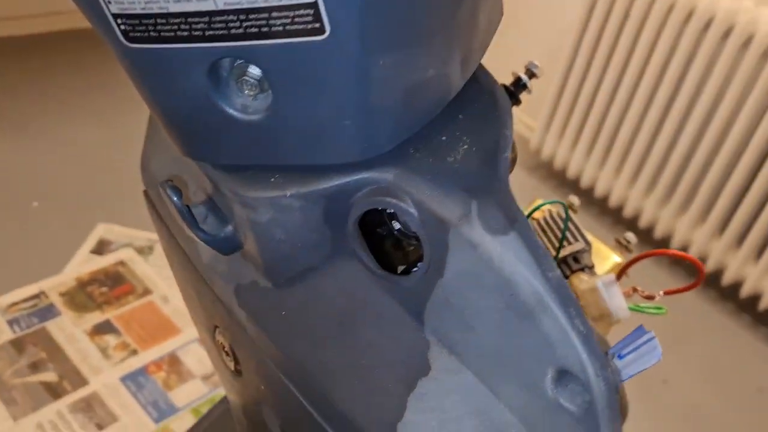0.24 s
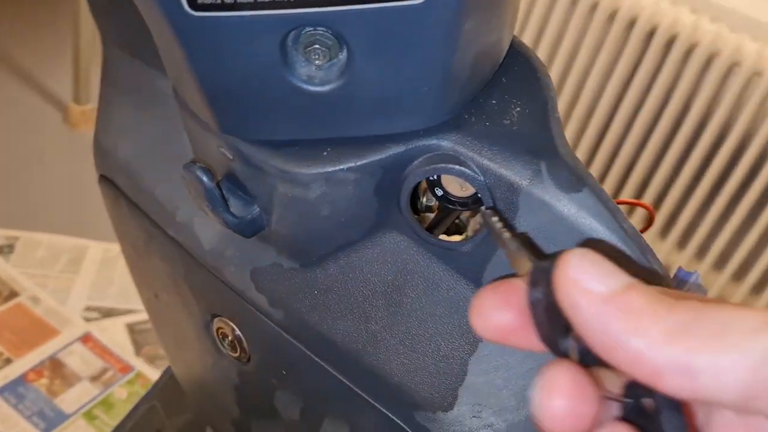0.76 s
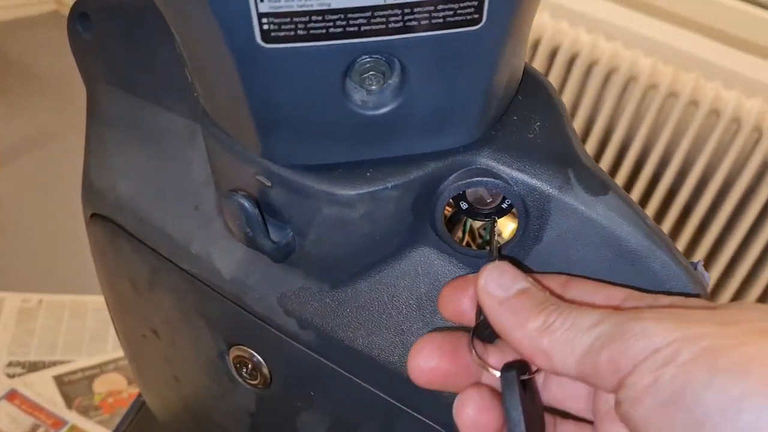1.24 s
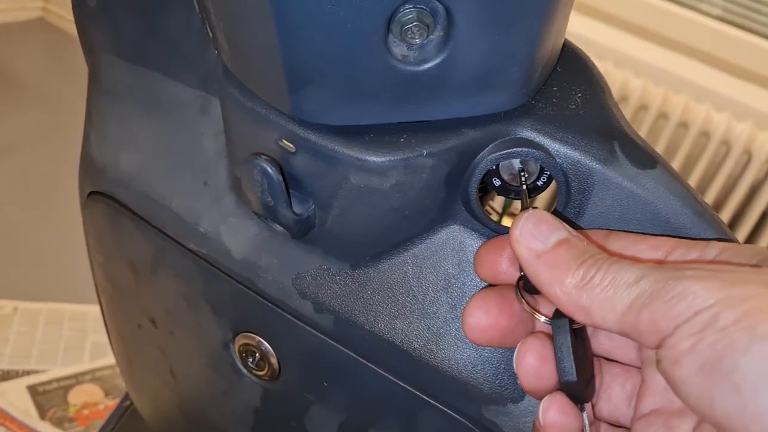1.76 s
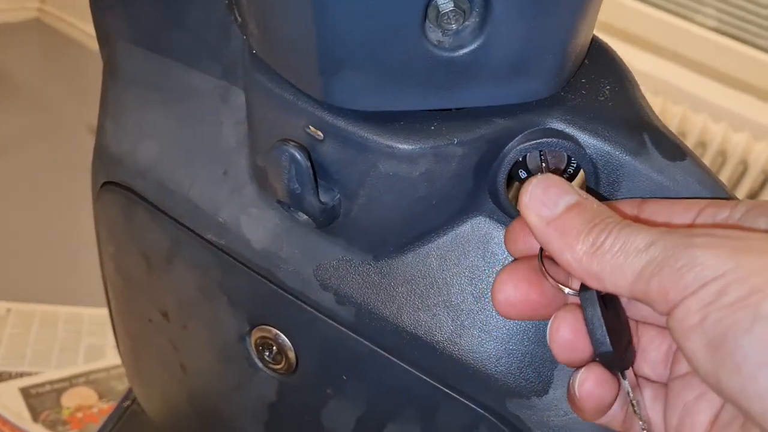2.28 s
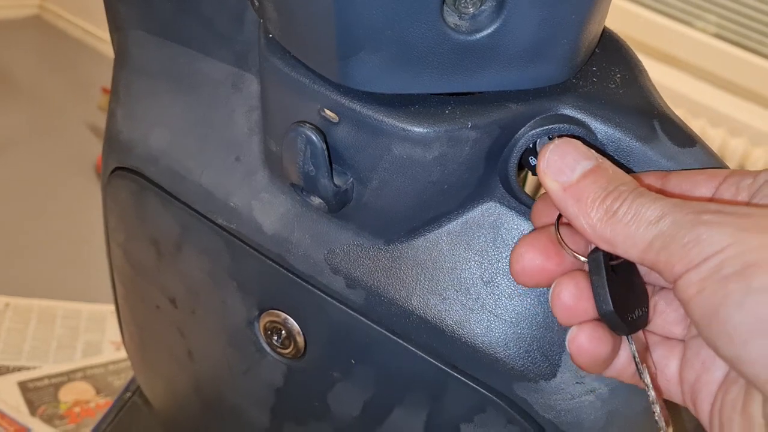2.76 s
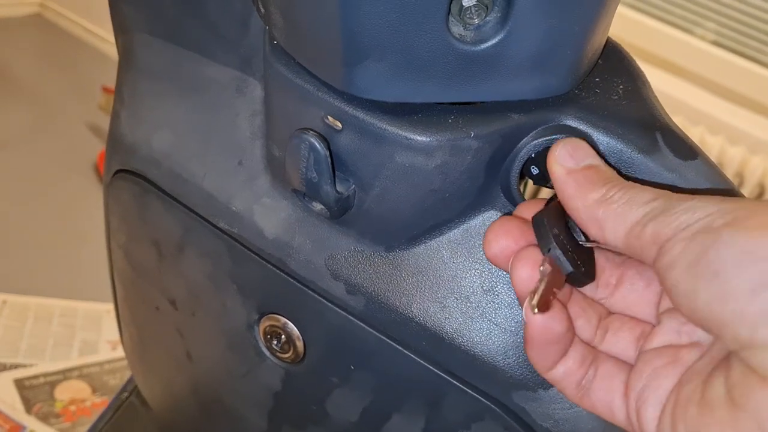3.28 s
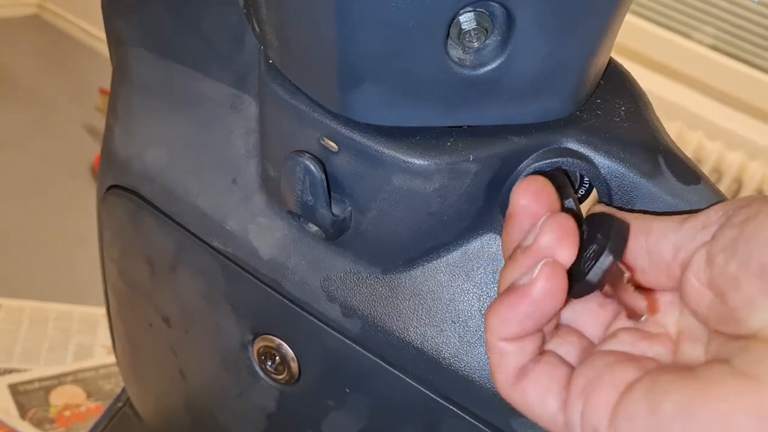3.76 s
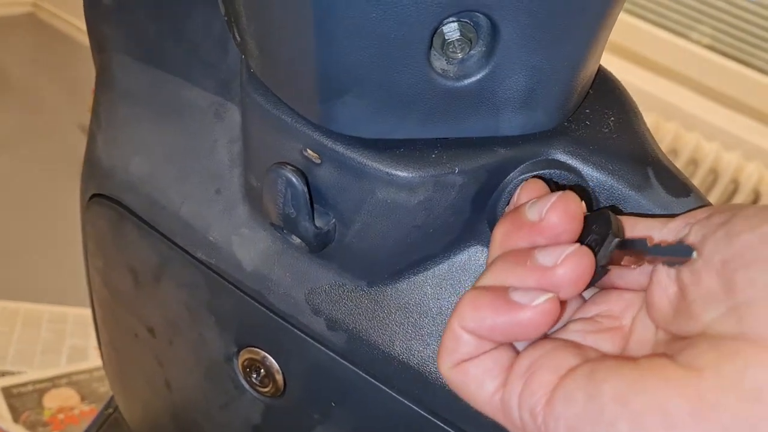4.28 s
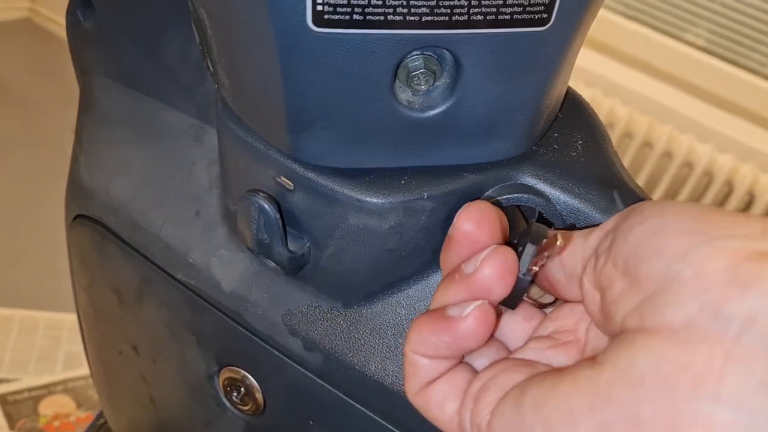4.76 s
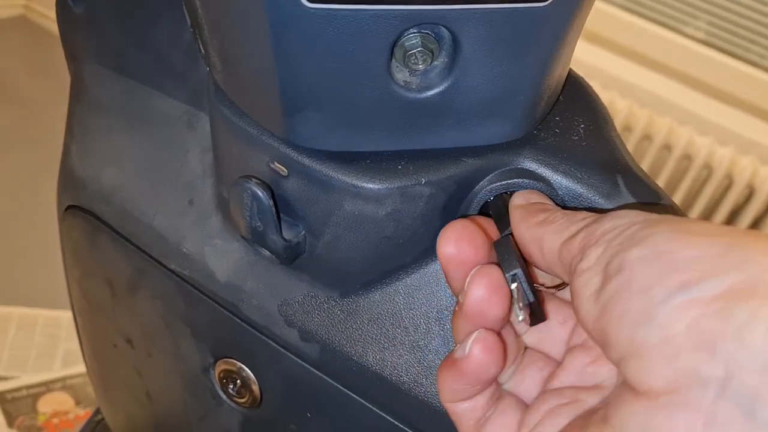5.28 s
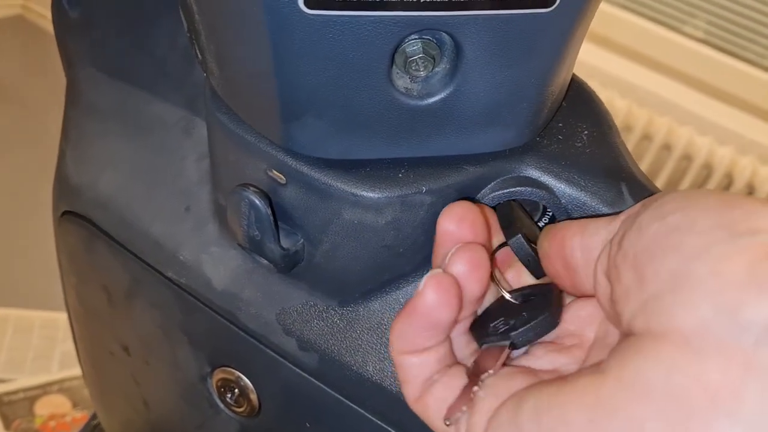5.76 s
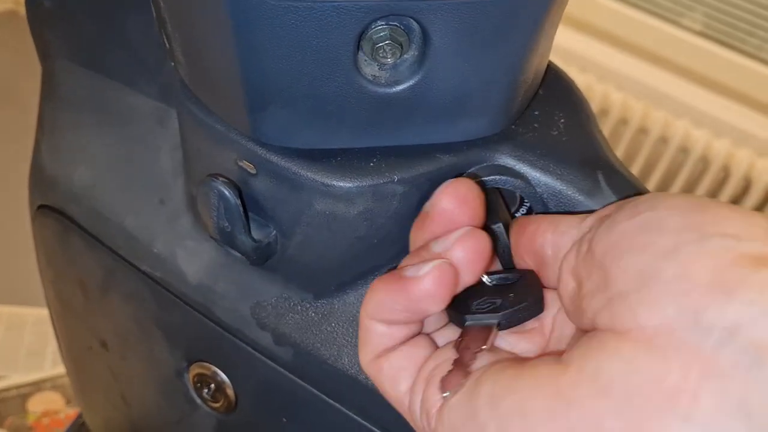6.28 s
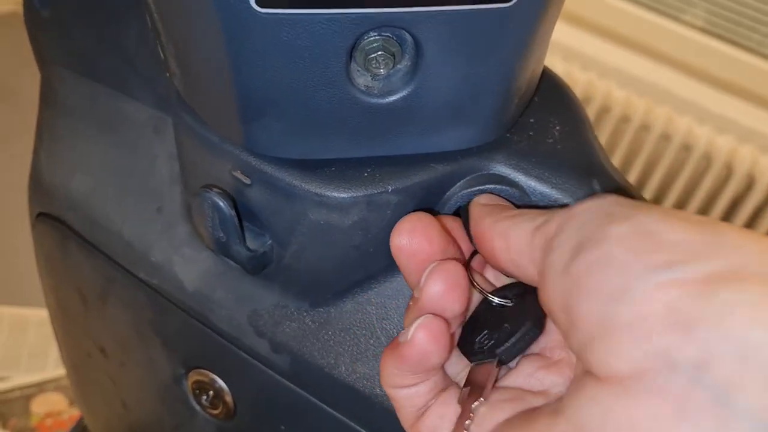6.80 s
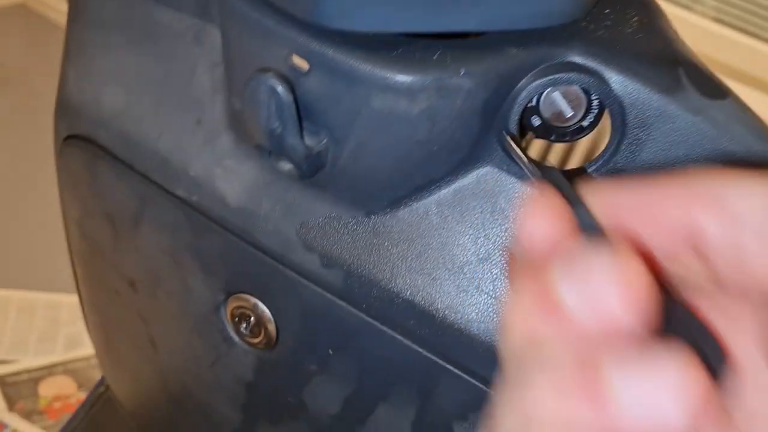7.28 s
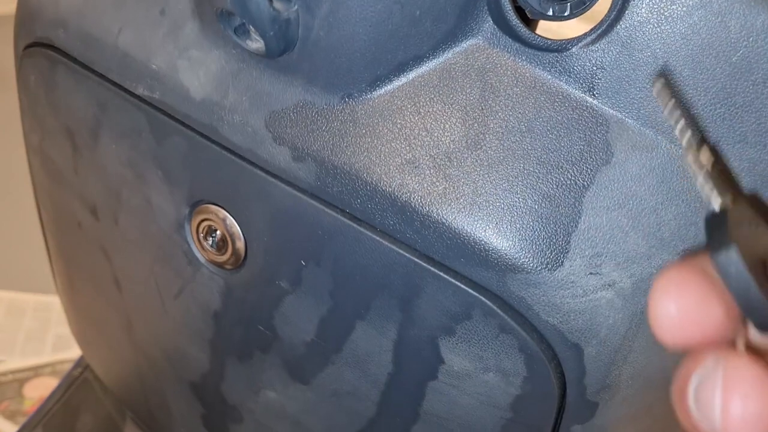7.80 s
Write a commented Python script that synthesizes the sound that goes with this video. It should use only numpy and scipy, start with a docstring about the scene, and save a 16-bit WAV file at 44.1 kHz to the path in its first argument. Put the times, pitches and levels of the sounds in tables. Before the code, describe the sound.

The sound is close, in a small hard-walled room with faint steady air. A sleeve rustles through the first second and a half, with one soft, dull knock at the start. Around 1.3 seconds a metal key scrapes lightly into a scooter's ignition lock, ending in a tick and a thin ping. Another tick comes at 2.2. From 2.8 to 3.5 seconds the key is worked in the lock: a cluster of sharp ticks, short rasps and clacks, with a low rub of the hand on the plastic panel. Soft, dull thuds and faint scrapes follow, with clearer clacks at about 5.4 and 6.1 and lighter ones between and after. At 7.2 seconds the key is pulled out with a bright scrape, a very high short squeak, rapid ticks and a ping, ending in the loudest clack and a slight rumble. A soft sleeve swish fades by 8 seconds.

```python
"""In a small hard room, close by, a key is pushed into a scooter's ignition lock, turned to and fro and pulled
out. Each contact rings the wafers, the lock barrel, its housing and the plastic leg shield. The blade scrapes
in the keyway and squeaks as it leaves, and the keys ping. A sleeve rustles as the hand comes and goes, and
short low rumbles sound now and then over quiet air."""
import sys
import numpy as np
from scipy import signal
from scipy.fft import rfft, irfft
from scipy.io import wavfile

SR = 44100
rng = np.random.default_rng(int(sys.argv[2]) if len(sys.argv) > 2 else 0)


def master_out(mix):
    """Clip the mix to full scale and print it as 16-bit PCM to the path in sys.argv[1]."""
    frames = np.transpose(np.atleast_2d(mix))
    ceiling = np.clip(frames, -1, 1)
    pcm = np.round(ceiling * 32767).astype(np.int16)
    wavfile.write(sys.argv[1], SR, pcm)


N = 354608
TIME = np.arange(N) / SR
RING_SIZE = 12288   # samples of working space for one ring

# Resonances of the lock's three metal parts. Each row: frequency in Hz, width in Hz, level in dB.
HOUSING_MODES = [(548, 110, -4), (730, 60, 6.5), (805, 155, 4.5), (1047, 284, 2), (1267, 232, 3.5),
                 (1780, 670, -2.5), (2060, 197, 0.5), (2126, 506, 1.5), (3110, 1960, -5)]
BARREL_MODES = [(3190, 5400, -6), (4210, 2700, -2.5), (4350, 2770, 3), (6600, 890, -10), (7380, 2900, 5),
                (7690, 570, -3.5)]
WAFER_MODES = [(10000, 660, -4.5), (11400, 690, -4.5), (12950, 3900, -6.5), (13530, 2000, -3),
               (15100, 700, -14)]


def clacks(wafer_db=-10.5):
    """The lock hits a stop: the housing jolts and pushes the shield; hard hits ring barrel and wafers."""
    # Each row: start in seconds, housing level in dB, shield and barrel against the housing in dB,
    # chatter in ms, favoured Hz of the lock and of the shield, left over right in dB.
    stops = [(2.7924, -40.5, -3.5, -17, 9.1, 1230, 340, -1.5),
             (3.047, -35.5, -2.5, -5.5, 3.7, 1620, 334, -1.5), (3.1778, -44.5, 6, -6, 2.1, 770, 305, 1),
             (3.3472, -35, -9.5, -4, 4, 4530, 290, 3), (3.4773, -36, -3.5, -0.5, 3.65, 1400, 310, 1),
             (3.786, -48.5, 5, -28, 4.6, 1170, 315, -1.5), (5.423, -36.5, 3.5, -1.5, 2, 580, 410, 4),
             (5.688, -50, 6.5, -23, 15, 740, 290, -1), (5.717, -44.5, -2, -17, 4.2, 1400, 300, -7),
             (6.105, -38.5, 3.5, -13.5, 1.55, 877, 295, 1.5), (6.5795, -47.5, 6, -5, 4.5, 1290, 278, 1),
             (7.2543, -29, -6.5, -26.5, 2.5, 1310, 170, 2), (7.26, -24.5, -4.5, -26, 1.2, 1124, 180, 0.5),
             (7.271, -34, -1, -14.5, 5.1, 2770, 155, 1.5)]
    out = np.zeros((2, N))
    for s, db, push_db, hardness_db, ms, lock_hz, shield_hz, pan_db in stops:
        barrel_db = db + hardness_db
        clack = contact(db + push_db, db, barrel_db, barrel_db + wafer_db, ms, lock_hz, shield_hz, pan_db)
        add(out, s, clack)
    return out


def ticks(run_start_s=7.1801, run_gap_s=.011, housing_loss=1.59):
    """The blade ticks on the wafers; the sharper a tick, the less it moves the big parts."""
    # Each row: start in seconds, wafer level in dB, sharpness (wafers over barrel) in dB,
    # chatter in ms, left over right in dB.
    single_ticks = [(1.4062, -47, 0, 3.3, 2.5), (2.2494, -46.5, 5, 1.95, 6.5), (2.787, -42.5, 6, 4, 7.5),
                    (2.881, -38.5, 6, 1.55, 5.5), (3.0419, -43, 5, 5.6, -6), (3.0714, -46, 2.5, 2, -5),
                    (3.1467, -44, 8, 2, 1), (3.162, -40.5, 7.5, 3.7, -1.5), (3.3037, -54, -3.5, 3.5, 2),
                    (5.2221, -54, 3, 1, 16), (5.7097, -50.5, 13, 1.5, 11.5), (6.949, -68, 5.5, 2, -1),
                    (7.2257, -29, 9.5, 3.6, 7), (7.235, -42, 9, 2.6, 9)]
    # on the way out the blade drops over four wafers, ever more lightly
    run = [(run_start_s + k * run_gap_s, -34.5 - 3.5 * k, 11.5, 2, 2.5) for k in range(4)]
    out = np.zeros((2, N))
    for s, db, sharpness_db, ms, pan_db in single_ticks + run:
        housing_db = db - housing_loss * sharpness_db
        tick = contact(shield_db=housing_db - 5, housing_db=housing_db, barrel_db=db - sharpness_db,
                       wafer_db=db, chatter_ms=ms, lock_hz=12100, shield_hz=323, pan_db=pan_db)
        add(out, s, tick)
    return out


def nudges():
    """The key leans on the lock: the shield gives with a dull thud and the metal hardly sounds."""
    # Each row: start in seconds, shield level in dB, favoured frequency of the shield in Hz.
    thuds = [(0.28, -50, 316), (3.202, -41, 320), (3.741, -47, 295), (3.795, -46, 310), (3.838, -54, 316),
             (4.482, -46.5, 246), (4.504, -47.5, 244), (4.801, -60.5, 250), (4.86, -56, 252),
             (5.161, -50, 277), (5.181, -42.5, 280), (5.333, -53, 262), (6.342, -46.5, 275),
             (6.376, -45, 277), (7.154, -44, 237), (7.2, -44.5, 317)]
    out = np.zeros((2, N))
    for s, db, shield_hz in thuds:
        thud = contact(shield_db=db, housing_db=db - 28.5, barrel_db=db - 27.5, wafer_db=db - 41,
                       chatter_ms=9, lock_hz=1160, shield_hz=shield_hz, pan_db=-7.5)
        add(out, s, thud)
    return out


def contact(shield_db, housing_db, barrel_db, wafer_db, chatter_ms, lock_hz, shield_hz, pan_db):
    """One force rings four parts; the hand shades the lock to one side, the shield sounds all round."""
    # Resonances of the plastic leg shield. Each row: frequency in Hz, width in Hz, level in dB.
    shield_modes = [(59.1, 18, -17.5), (154, 6.6, -7.5), (230.7, 10.7, 3.5), (263.8, 37, -4.5),
                    (339.3, 21.3, -2), (392, 47, -9.5), (510.5, 128, -10.5)]
    force = chatter(chatter_ms)
    parts = [(HOUSING_MODES, housing_db), (BARREL_MODES, barrel_db), (WAFER_MODES, wafer_db)]
    lock = sum(ring(force, favour(modes, lock_hz), db) for modes, db in parts)
    shield = ring(force, favour(shield_modes, shield_hz), shield_db)
    return lock * pan(pan_db) + shield


def chatter(ms, snap=1.19, snap_at_ms=.5):
    """A clean contact is one snap; a loose one grinds in and bounces to rest."""
    age = np.arange(RING_SIZE // 6) * 1000 / SR / ms   # in decay times
    force = grains(len(age), per_s=7000, spread_db=17.5) * np.exp(-age) * (1 - np.exp(-4 * age))
    force[round(snap_at_ms * SR / 1000)] += snap * np.exp(-ms / 3)
    # hard metal pushes all frequencies alike, so the colour comes from the parts alone
    spectrum = rfft(force)
    return irfft(spectrum / (np.abs(spectrum) + 1e-9))[:len(age) // 2]


def grains(size, per_s, spread_db):
    """Tiny impacts at random moments, of very uneven strength."""
    chance, depth, sign = rng.random((3, RING_SIZE))[:, :size]
    return (chance < per_s / SR) * from_db(-spread_db * depth) * np.sign(sign - .5)


def favour(modes, struck_hz, boost_db=8, octaves=.3):
    """The point of contact favours the resonances near one frequency."""
    return [(hz, width, db + boost_db * np.exp(-(np.log2(hz / struck_hz) / octaves) ** 2))
            for hz, width, db in modes]


def ring(force, modes, db, vary_db=1.84, lag_s=.00006):
    """A force rings a part's modes, with as much energy as 10 ms of steady sound at the given level."""
    hz = np.arange(1, RING_SIZE // 2 + 2) * SR / RING_SIZE
    centre, width, mode_db = np.transpose(modes)
    # each mode has its own strength and its own path to each side; high modes differ most
    strength, left, right, lag = rng.standard_normal((len(centre), 4)).T
    sides = np.array([left, right]) * np.minimum(centre / 3000, 1)
    gain = from_db(mode_db + vary_db * (strength + sides))
    polarity = (-1) ** np.arange(len(centre))
    path = polarity * np.exp(2j * np.pi * centre * lag_s * np.array([lag, -lag]))
    resonances = 1 / (1 + 1j * (hz - centre[:, None] ** 2 / hz) / width[:, None])
    response = (gain * path) @ resonances
    sound = irfft(rfft(force, RING_SIZE) * response)[:, :RING_SIZE * 3 // 4]
    energy = np.mean(np.sum(sound ** 2, axis=1))
    return from_db(db) * sound * np.sqrt(SR / 100 / energy)


def scrapes():
    """The cut edge of the blade rasps over the lock and the wafers."""
    # Each row: start and end in seconds, level in dB, brightness (barrel over housing) in dB.
    strokes = [(1.257, 1.387, -57, -2), (2.673, 2.706, -59, -6), (3.048, 3.102, -45, -11),
               (3.112, 3.18, -51.5, -6), (3.765, 3.866, -64, -0.5), (4.475, 4.536, -78.5, 0),
               (4.783, 4.9, -73, 2.5), (5.149, 5.238, -64.5, 0), (5.676, 5.736, -54, -11),
               (6.346, 6.488, -68, -5), (6.912, 6.989, -67.5, -0.5), (7.146, 7.233, -45, 4.5),
               (7.224, 7.252, -39.5, 4.5)]
    out = np.zeros((2, N))
    for start, end, db, bright_db in strokes:
        size = int(np.clip((end - start) * SR, SR / 100, RING_SIZE // 2))
        force = grains(size, per_s=2500, spread_db=33) * signal.windows.tukey(size, .4)
        # in a bright stroke the smallest parts take over
        parts = [(HOUSING_MODES, 0), (BARREL_MODES, bright_db), (WAFER_MODES, 2 * bright_db - 4)]
        rasp = sum(ring(force, modes, part_db) for modes, part_db in parts)
        add(out, start, from_db(db) * rasp / np.std(rasp[:, :size]))
    return out * pan(2)


def key_pings():
    """The thin metal of the keys pings when flicked."""
    # Each row: start in seconds, pitch in Hz, peak level in dB, seconds to fade by 60 dB.
    pings = [(1.405, 8400, -39, 0.04), (1.407, 7750, -42, 0.048), (1.406, 2640, -38, 0.016),
             (1.407, 4840, -52, .03), (2.785, 12950, -42, 0.15), (2.788, 13300, -41, 0.095),
             (2.787, 12300, -45.5, 0.11), (5.423, 4750, -27.5, 0.01), (5.422, 5290, -27, 0.014),
             (7.226, 11530, -32, 0.14), (7.226, 10300, -45, 0.092)]
    out, age = np.zeros((2, N)), TIME[:RING_SIZE]
    for s, hz, db, t60 in pings:
        add(out, s, from_db(db - 60 * age / t60) * key_tone(hz, RING_SIZE))
    return out


def squeak(hz=11150):
    """The blade sticks and slips on its way out, in short, high chirps."""
    # Each row: start in seconds, length in seconds, peak level in dB.
    slips = [(7.154, 0.01, -23.5), (7.166, 0.025, -29), (7.187, .028, -37)]
    envelope = sum(from_db(db) * np.sin(np.pi * np.clip((TIME - s) / length, 0, 1)) ** 2
                   for s, length, db in slips)
    return envelope * key_tone(hz, N) * pan(8)


def key_tone(hz, size, waver_hz=70):
    """One mode of a key; the grip makes its pitch unsteady."""
    pitch = hz + waver_hz * drift(300)[:size]
    return np.sin(2 * np.pi * np.cumsum(pitch) / SR)


def knock(start_s=.1381, low_hz=300, high_hz=1200):
    """One soft, dull knock on a small panel: neither treble nor deep bass."""
    # Each row: resonance in Hz, width in Hz, level in dB.
    panel_modes = [(507, 325, 2.5), (815, 450, 3.5), (1070, 420, -0.5)]
    force = signal.sosfilt(signal.butter(3, high_hz, fs=SR, output="sos"), signal.unit_impulse(RING_SIZE))
    force = signal.sosfilt(signal.butter(1, low_hz, "high", fs=SR, output="sos"), force)
    out = np.zeros((2, N))
    add(out, start_s, ring(force, panel_modes, db=-31, vary_db=0.27))
    return out


def sleeve(rise_share=.5, fibre_db=0.87, fold_db=1.5):
    """Cloth rubs in small catches; each move of the arm swells to a peak and fades more slowly."""
    # Each row: time of the peak in seconds, level in dB, seconds to fade by 20 dB.
    swishes = [(0.005, -41, 0.22), (.31, -51.5, 0.62), (.62, -49.5, 0.26), (.7, -48, 0.28),
               (.92, -56.5, .7), (1.06, -58.5, 0.19), (1.308, -51, 0.2), (7.48, -56.5, 0.42)]
    # Each row: frequency in Hz, relative noise density in dB.
    cloth_colour = [(60, -18.5), (150, -11), (300, -8), (500, -9), (800, -8), (1400, -9.5), (2600, -12),
                    (4000, -11.5), (6200, -15), (7700, -13.5), (9300, -18.5), (16000, -15)]
    power = 0
    for s, db, fade_s in swishes:
        from_peak = np.maximum(TIME - s, (s - TIME) / rise_share)
        power = power + from_db(db - 20 * from_peak / fade_s) ** 2
    rubbing = np.sqrt(power) * coloured_noise(cloth_colour)
    catches = from_db(fibre_db * drift(450) + fold_db * drift(40))
    return rubbing * catches


def hand(trim_db=-2):
    """The hand shifts on the shield and murmurs through the plastic."""
    # Each row: time in seconds, level before the trim in dB.
    levels = [(0.0, -59.5), (0.96, -64.5), (1.12, -67.5), (2.71, -69), (3.27, -49), (4.12, -70),
              (5.24, -69.5), (5.35, -65), (5.6, -55.5), (6.0, -65), (6.38, -59), (6.94, -65.5), (7.19, -65),
              (7.35, -47), (7.61, -67), (8.04, -69)]
    # Each row: frequency in Hz, relative noise density in dB.
    murmur_colour = [(40, -41), (120, -14.5), (230, -3), (320, -0.5), (480, -12.5), (800, -19.5),
                     (2000, -27), (16000, -62.5)]
    level_db = np.interp(TIME, *np.transpose(levels))
    return from_db(level_db + trim_db) * coloured_noise(murmur_colour)


def low_rumbles(rise_s=0.004, t60=0.33, width=0.34):
    """Short low rumbles swell in and fade, nearly alike on both sides."""
    # Each row: start in seconds, level in dB.
    bumps = [(3.05, -67), (3.18, -63), (3.48, -59.5), (7.16, -51.5), (7.265, -56)]
    swell = sum(from_db(db - 60 * np.maximum(TIME - s, 0) / t60) * np.clip((TIME - s) / rise_s, 0, 1)
                for s, db in bumps)
    mid, side = band_noise(low_hz=32, high_hz=150)
    return swell * (mid + width * side * np.array([[1], [-1]]))


def room(x, first_echo_s=0.003, build_s=0.0012):
    """Dense reflections off hard walls build up within milliseconds and die away band by band."""
    # Each row: frequency in Hz, seconds to fade by 60 dB.
    decay_times = [(80, 0.5), (250, 0.46), (1000, 0.46), (4000, 0.42), (8000, 0.46), (16000, 0.32)]
    # Each row: frequency in Hz, relative echo level in dB.
    echo_colour = [(80, 4.5), (250, -0.5), (600, 1), (1500, -2.5), (4000, -1.5), (8000, -6), (15000, -10.5)]
    age = TIME[:SR] - first_echo_s
    build = 1 - np.exp(-np.maximum(age, 0) / build_s)
    echoes = 0
    for hz, noise in bands(SR):
        fade = build * from_db(-60 * age / at_hz(decay_times, hz))
        echoes = echoes + from_db(at_hz(echo_colour, hz)) * noise * fade / np.sqrt(np.sum(fade ** 2))
    return signal.fftconvolve(x, echoes, axes=1)[:, :N]


def room_tone(air_db=-73):
    """Quiet air with two faint, steady bands of hiss."""
    # Each row: centre in Hz, width in Hz, level in dB.
    hiss_bands = [(1640, 230, -81.5), (7540, 1300, -82.5)]
    # Each row: frequency in Hz, relative noise density in dB.
    air_colour = [(25, -20), (55, 1), (100, -6), (150, 5), (200, -16.5), (400, -11.5), (650, -13.5),
                  (1200, -28), (2000, -24), (2800, -29.5), (5000, -23), (10000, -23), (16000, -21)]
    hiss = sum(from_db(db) * band_noise(hz - width / 2, hz + width / 2) for hz, width, db in hiss_bands)
    return hiss + from_db(air_db) * coloured_noise(air_colour)


def bands(size):
    """Yields centre Hz and stereo noise for half-octave bands, narrow in the upper bass, wide on top."""
    # Each row: frequency in Hz, likeness of left and right from 0 to 1.
    likeness = [(30, 0.31), (130, 0.97), (300, 0.92), (600, 0.43), (1200, 0), (2500, 0), (16000, 0)]
    edges = np.geomspace(25, 18000, 20)
    white = rng.standard_normal((2, 2, size))
    for k, (low, high) in enumerate(zip(edges, edges[1:])):
        mid, side = band_pass(white[k % 2], low, high)
        hz = np.sqrt(low * high)
        alike = at_hz(likeness, hz)
        yield hz, np.sqrt((1 + alike) / 2) * mid + np.sqrt((1 - alike) / 2) * side * [[1], [-1]]


def coloured_noise(spectrum):
    """Stereo noise of a given spectrum; rms 1."""
    return rms_one(sum(from_db(at_hz(spectrum, hz)) * noise for hz, noise in bands(N)))


def band_noise(low_hz, high_hz):
    """One band of stereo noise; rms 1."""
    return rms_one(band_pass(rng.standard_normal((2, N)), low_hz, high_hz))


def band_pass(x, low_hz, high_hz):
    return signal.sosfilt(signal.butter(2, [low_hz, high_hz], "band", fs=SR, output="sos"), x)


def drift(per_s):
    """A random wander that changes course per_s times a second; rms 1."""
    knots = rng.standard_normal(4000)
    return rms_one(np.interp(TIME * per_s, np.arange(len(knots)), knots))


def at_hz(points, hz):
    """Reads a table on a log-frequency axis."""
    frequencies, values = np.transpose(points)
    return np.interp(np.log(hz), np.log(frequencies), values)


def add(out, s, sound):
    """Mixes a sound in at s seconds."""
    start = round(s * SR)
    out[:, start:start + sound.shape[-1]] += sound[..., :N - start]


def pan(db):
    """Stereo gains that put the left side db above the right."""
    return from_db([[db / 2], [-db / 2]])


def from_db(db):
    return 10 ** (np.asarray(db) / 20)


def rms_one(x):
    return x / np.sqrt(np.mean(x ** 2) + 1e-20)


def scene(room_db=-3):
    """The lock a little to the left, sleeve and hand a little to the right, over the room tone."""
    close = ticks() + clacks() + nudges() + scrapes() + key_pings() + squeak() + knock()
    # sound sent to either side comes back from the walls to both
    walls = from_db(room_db) * (room(close) + room(close[::-1]))
    handling = sleeve() + hand()
    return close * pan(2) + walls + handling * pan(-2.8) + low_rumbles() + room_tone()


def record(dry, cutoff_hz=15900):
    """A steep low-pass takes off the very top."""
    return signal.sosfilt(signal.ellip(10, .3, 80, cutoff_hz, fs=SR, output="sos"), dry)


dry = scene()
out = record(dry)
master_out(out)
```